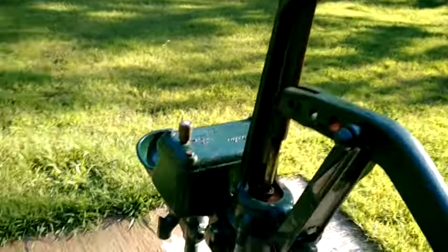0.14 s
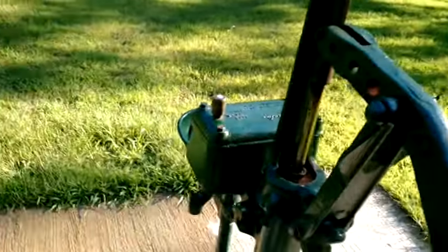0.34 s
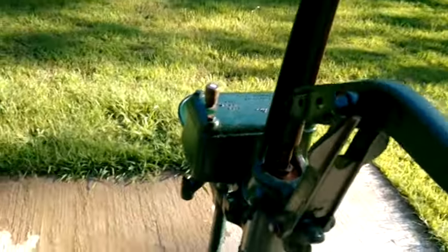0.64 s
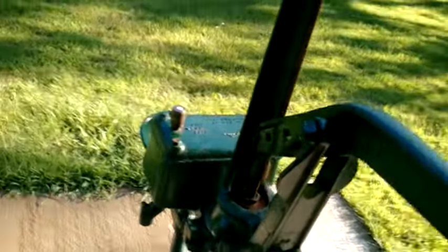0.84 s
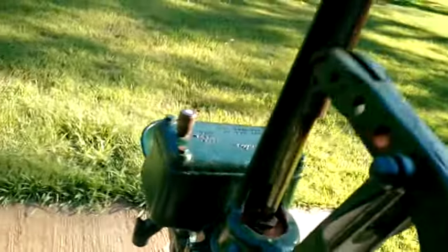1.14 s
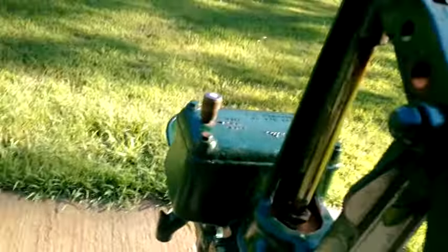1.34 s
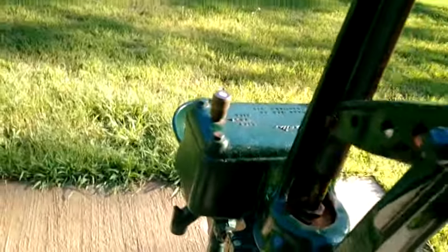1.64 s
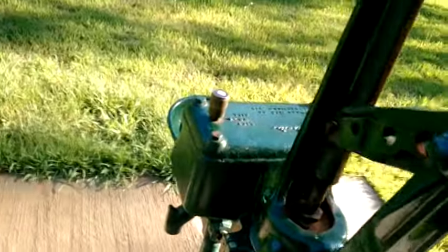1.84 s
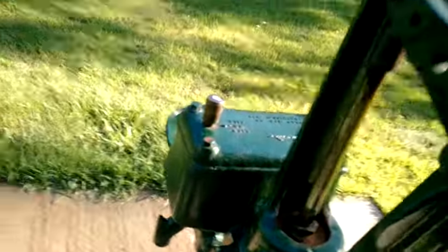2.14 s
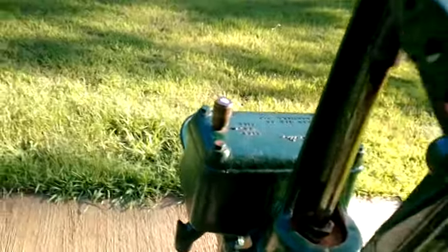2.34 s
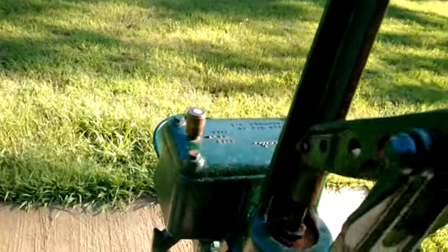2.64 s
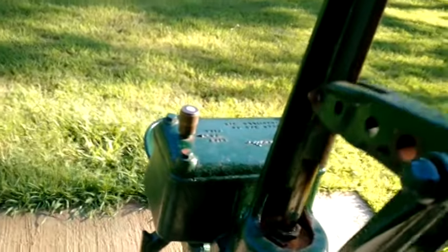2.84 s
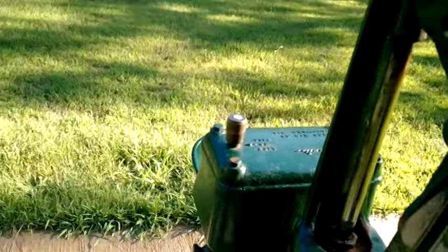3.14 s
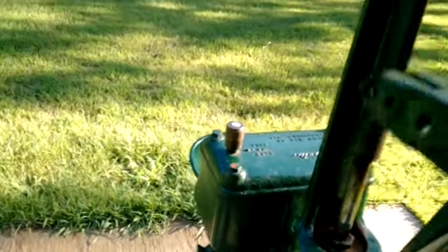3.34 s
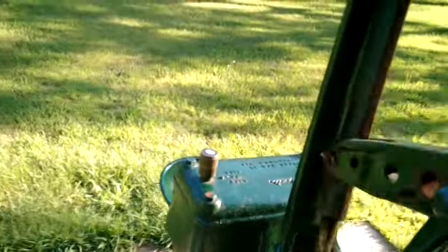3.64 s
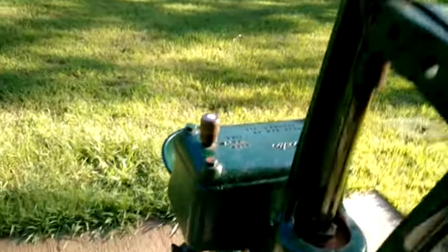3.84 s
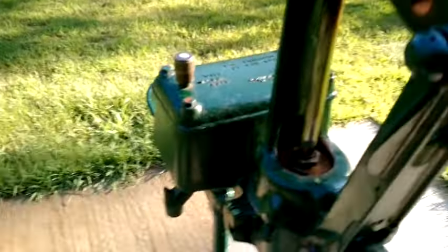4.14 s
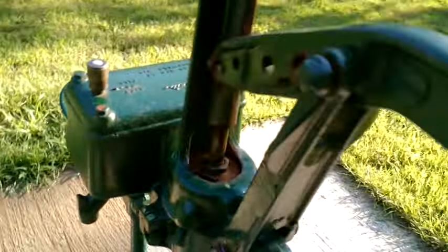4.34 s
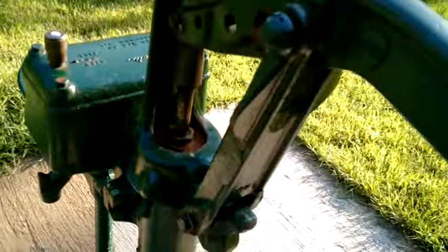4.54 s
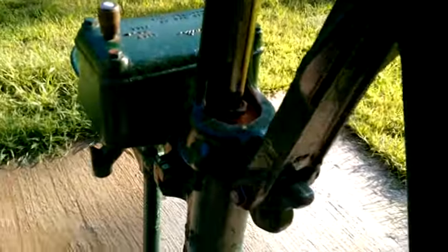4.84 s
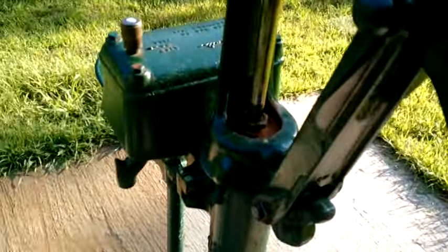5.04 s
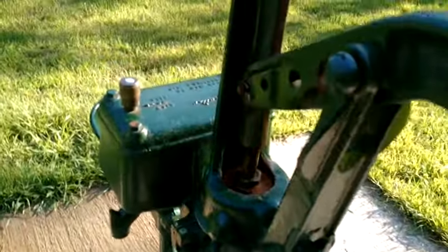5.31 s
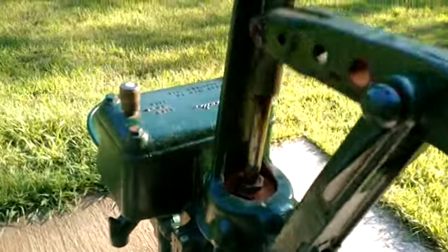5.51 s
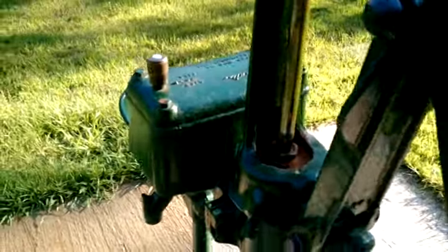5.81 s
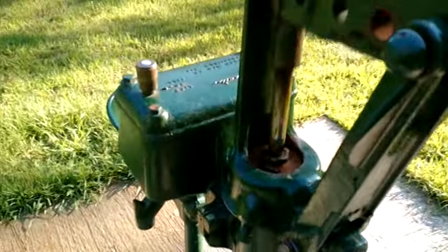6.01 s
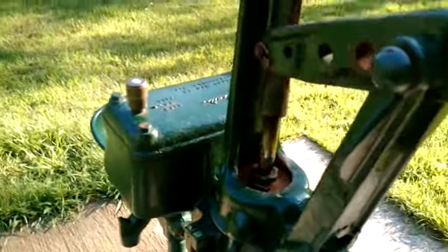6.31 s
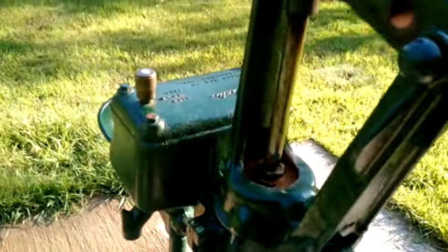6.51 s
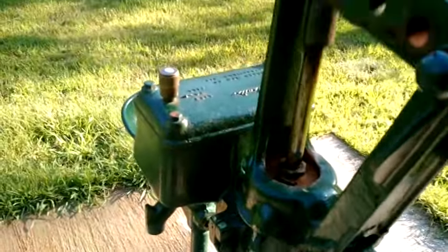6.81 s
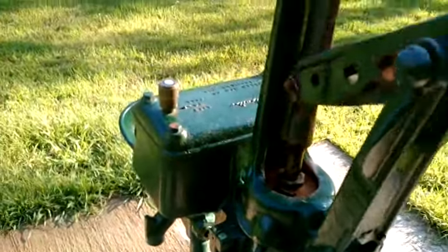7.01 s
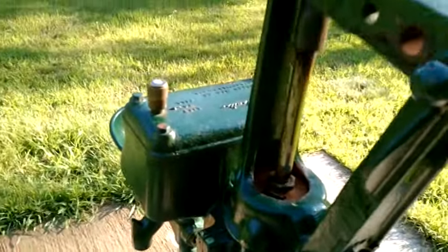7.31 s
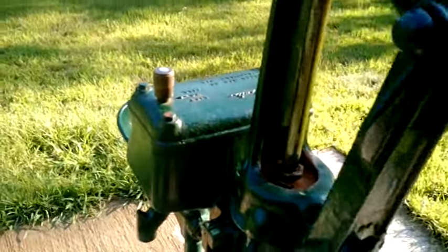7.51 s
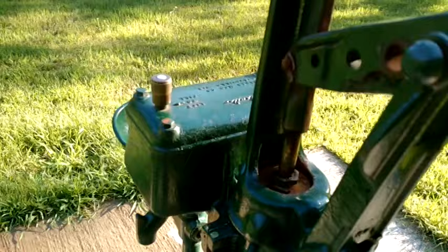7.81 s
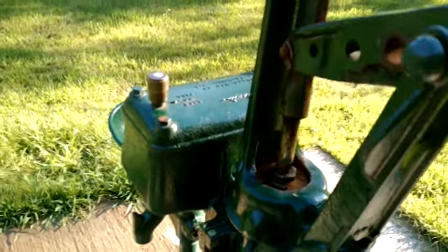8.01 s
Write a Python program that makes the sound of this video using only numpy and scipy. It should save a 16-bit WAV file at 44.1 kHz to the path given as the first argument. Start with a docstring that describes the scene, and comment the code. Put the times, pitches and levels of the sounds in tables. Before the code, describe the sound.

A dry iron hand pump squeals and clanks about once a second outdoors, with water splattering and gurgling in bursts and faint wind rumble.

```python
"""Squeaky hand pump on a lawn

A cast-iron hand pump is worked about once every 0.9 s, while light wind rumbles on the microphone.
Water is filtered noise mixed with many tiny ringing bubbles and drops; it comes in bursts of hiss and
splatter and in hollow, bubbling swells. Slack linkage clanks as short bursts of coloured noise.
The dry pivot squeals, mostly stepping down in pitch: stacks of harmonics with an unsteady pitch and level.
Whistles and groans are short gliding tones, and the squealing also stirs the ringing of the iron lever."""
import sys
import numpy as np
from scipy import signal
from scipy.fft import rfft, irfft
from scipy.io import wavfile
from scipy.ndimage import uniform_filter1d, map_coordinates

SR = 44100
rng = np.random.default_rng(int(sys.argv[2]) if len(sys.argv) > 2 else 0)


def bounce(signal):
    """Save signal as a 16-bit WAV file at the path given by the first command-line argument."""
    frames = np.transpose(np.atleast_2d(signal))
    limited = np.clip(frames, -1, 1)
    pcm = np.round(limited * 32767).astype(np.int16)
    wavfile.write(sys.argv[1], SR, pcm)


N = 359856
T = np.arange(N) / SR   # time of every sample [s]


def from_db(db):
    """Turn decibels into a gain."""
    return 10 ** (np.asarray(db) / 20)


def rms_one(x):
    """Scale to an rms (average strength) of 1."""
    return x / np.sqrt(np.mean(x ** 2) + 1e-20)


def follow(rows, t):
    """Read a (time, level) curve at times t, with straight lines between its points."""
    times, levels = np.transpose(rows)
    return np.interp(t, times, levels)


def colour(x, spectrum):
    """Filter a steady sound by (frequency [Hz], gain [dB]) points, steeply cut outside them; rms 1."""
    hz, db = np.transpose(spectrum)
    log_hz = np.log(np.maximum(np.fft.rfftfreq(len(x), 1 / SR), 1))
    below = np.maximum(np.log(hz[0]) - log_hz, 0)
    above = np.maximum(log_hz - np.log(hz[-1]), 0)
    gain = from_db(np.interp(log_hz, np.log(hz), db)) * np.exp(-4 * (below + above))
    return rms_one(irfft(rfft(x) * gain, len(x)))


def drift(rate, size):
    """A smooth random wander with a spread of about 1, heading somewhere new `rate` times a second."""
    knots = rng.standard_normal(4096)
    return map_coordinates(knots, [np.arange(size) * rate / SR], order=2, mode="wrap")


def ring(x, hz, t60):
    """A resonance: a unit click starts a sine of height 1 that falls 60 dB in t60 seconds."""
    r, w = from_db(-60 / (t60 * SR)), 2 * np.pi * hz / SR
    return signal.lfilter([0, np.sin(w)], [1, -2 * r * np.cos(w), r * r], x + 1e-18)


def envelope(x, size=900):
    """Running rms level over `size` samples."""
    return np.sqrt(np.abs(uniform_filter1d(x ** 2, size=size)) + 1e-12)


def bump(s, rise, fall):
    """A rounded hump of height 1 at time s, with its own rise and fall times [s]."""
    return np.exp(-np.minimum(((T - s) / np.where(T < s, rise, fall)) ** 2, 60))


def swells(rows, fall):
    """Add up the power of humps (peak time [s], rise [s], level [dB]); each falls in `fall` times its rise."""
    return sum(from_db(db) ** 2 * bump(s, rise, fall * rise) for s, rise, db in rows)


# Tone of the wind rumble: (frequency [Hz], gain [dB])
WIND_TONE = [(14, 3), (26, 4.5), (45, -4), (70, -17), (100, -18.5), (160, -35.5), (400, -30.5)]
# Strength of the steady breeze: (time [s], level [dB])
BREEZE_LEVEL = [(0.0, -42), (1.7, -51.5), (2.3, -56), (3.1, -51), (6.1, -50.5), (7.6, -50)]
# Puffs that bump the microphone: (peak time [s], rise [s], level [dB])
WIND_PUFFS = [(0.235, 0.039, -38), (0.46, 0.04, -44.5), (1.01, 0.077, -40), (1.23, 0.027, -38),
              (1.4, 0.0083, -38), (1.77, 0.02, -41), (3.25, 0.013, -44), (3.68, 0.058, -37.5),
              (4.85, 0.02, -40.5), (5.7, 0.018, -43), (7.33, 0.046, -45.5), (8.1, 0.034, -34.5)]
BREEZE_SWING_DB = 1.5


def wind(buffet_db=-7, puff_fall=0.99, lumps_db=4.0):
    """Air pressing on the microphone gives a low rumble; puffs add a lumpy thump higher in pitch."""
    breeze = from_db(follow(BREEZE_LEVEL, T) + BREEZE_SWING_DB * drift(9, N))
    puffs = np.sqrt(swells(WIND_PUFFS, puff_fall))
    rumble = colour(rng.standard_normal(N), WIND_TONE)
    thump = colour(rng.standard_normal(N), [(55, 19.5), (100, 9.5), (180, -4.5)])
    buffet = from_db(buffet_db + lumps_db * drift(60, N)) * thump
    return np.hypot(breeze, puffs) * rumble + puffs * buffet


def grains(per_s, low_hz, high_hz, cycles, spread_db, clump_db):
    """Clumps of ringing bubbles or drops, each dealt one of 20 pitches and down 60 dB after `cycles` cycles."""
    sizes = from_db(spread_db * np.minimum(rng.exponential(1, N), 4)) * rng.choice([-1, 1], N)
    born = rng.random(N) < per_s * from_db(clump_db * drift(50, N)) / SR
    pitches = np.geomspace(low_hz, high_hz, 20)
    dealt = rng.integers(0, len(pitches), N)
    total = 0
    for k, hz in enumerate(pitches):
        total = total + hz / low_hz * ring(sizes * born * (dealt == k), hz, cycles / hz)
    return rms_one(total)


def glugs(per_s=85, low_hz=850, high_hz=1400, cycles=4, rise=0.036, spread_db=9, size=3000):
    """Big air pockets break loose and ring, rising in pitch as they near the surface."""
    out, t = np.zeros(N + size), np.arange(size) / SR
    for when, pitch, strength in rng.random((int(per_s * N / SR), 3)):
        hz = low_hz * (high_hz / low_hz) ** pitch
        age = t * hz / cycles
        tone = np.sin(2 * np.pi * hz * t * (1 + rise * age / 2))
        out[int(when * N):][:size] += from_db(spread_db * strength) * age * np.exp(-age) * tone
    return rms_one(out[:N])


BURST_ATTACK_S, BURST_RELEASE_S = 0.015, 0.038


def burst_shape(start, length):
    """A burst rises quickly, holds, then trails off."""
    rise = np.clip((T - start) / BURST_ATTACK_S, 0, 1)
    return rise * np.exp(-np.clip((T - start - length) / BURST_RELEASE_S, 0, 20))


# Water that keeps running between strokes: (time [s], level [dB])
RUNNING_WATER = [(0.0, -52.5), (0.6, -46.5), (1.2, -47), (1.6, -48), (2.1, -55), (3.0, -48.5), (3.8, -45),
                 (4.7, -48), (5.6, -47.5), (6.3, -45.5), (7.4, -44.5), (8.16, -47.5)]
# Swells of hollow, bubbling noise, one of them under a clank: (peak time [s], rise [s], level [dB])
HOLLOW_SWELLS = [(0.69, 0.056, -42.5), (0.745, 0.047, -43), (1.7, 0.085, -40), (2.65, 0.11, -48),
                 (3.49, 0.058, -47.5), (4.385, 0.089, -43), (5.24, 0.063, -43), (6.155, 0.074, -45.5),
                 (7.02, 0.094, -43), (7.86, 0.081, -43), (8.12, 0.029, -42)]
# Bursts of hiss, splatter and hollow low noise, some under squeals or clanks:
# (start [s], length [s], splatter level [dB], hollow level [dB])
SPLATTER_BURSTS = [(0.435, 0.39, -74, -52.5), (0.708, 0.013, -28.5, -33), (0.888, 0.08, -33, -55),
                   (1.274, 0.055, -33, -49.5), (1.389, 0.12, -41, -48.5), (2.302, 0.19, -44, -55.5),
                   (3.199, 0.12, -42, -53.5), (3.579, 0.1, -39.5, -52.5), (3.993, 0.22, -38.5, -51.5),
                   (4.538, 0.27, -38.5, -55), (4.882, 0.16, -42.5, -52), (4.963, 0.21, -38, -54),
                   (5.353, 0.058, -42, -53.5), (5.749, 0.25, -40.5, -52.5), (6.304, 0.23, -34, -54.5),
                   (6.667, 0.1, -34, -47.5), (7.122, 0.1, -32, -49.5), (7.524, 0.095, -37, -48.5),
                   (8.013, 0.078, -31, -50)]
# The water falters as the handle stalls: (time [s], half length [s])
WATER_LULLS = [(0.4, 0.013), (1.22, 0.042), (2.95, 0.043), (3.814, 0.022), (4.84, 0.018), (5.706, 0.031),
               (6.65, 0.013), (7.907, 0.0097)]
LULL_DB = -4.5
FLOW_BOX_DB, FLOW_BUBBLE_DB, FLOW_SPLATTER_DB = -13.5, 1.5, 0   # against the running water's level
SWELL_BUBBLE_DB, SWELL_SPLATTER_DB = 5, -0.5   # against the level of a swell
BURST_BUBBLE_DB = -24   # against the splatter level of a burst


def water_levels():
    """Running water, swells and bursts add in power: the gains of spout box, bubbling and splatter."""
    flow = from_db(follow(RUNNING_WATER, T))
    swell = np.sqrt(swells(HOLLOW_SWELLS, fall=1))
    burst = burst_box = 0
    for start, length, splatter_db, box_db in SPLATTER_BURSTS:
        shape = burst_shape(start, length)
        burst = burst + from_db(splatter_db) * shape
        burst_box = burst_box + from_db(box_db) * shape
    box = [from_db(FLOW_BOX_DB) * flow, swell, burst_box]
    bubbling = [from_db(FLOW_BUBBLE_DB) * flow, from_db(SWELL_BUBBLE_DB) * swell, from_db(BURST_BUBBLE_DB) * burst]
    splatter = [from_db(FLOW_SPLATTER_DB) * flow, from_db(SWELL_SPLATTER_DB) * swell, burst]
    lull = sum(bump(s, half, half) for s, half in WATER_LULLS)
    return np.linalg.norm([box, bubbling, splatter], axis=1) * from_db(LULL_DB * lull)


# Tone of the hollow spout box: (frequency [Hz], gain [dB])
BOX_TONE = [(100, -55), (160, -17), (220, -11.5), (280, -12.5), (420, -17.5), (500, 5), (550, 2),
            (600, 6.5), (660, -5.5), (800, -2), (1000, -1.5)]
# Tone of the gurgling bubbles: (frequency [Hz], gain [dB])
BUBBLE_TONE = [(500, -30), (800, -35), (1050, 3), (1400, -0.5), (2000, 0), (2700, -3.5), (3600, -9.5),
               (5000, -8.5), (10000, -23)]
# Tone of the splattering drops: (frequency [Hz], gain [dB])
SPLATTER_TONE = [(1000, -3.5), (2000, 10), (2900, -2), (3800, 9.5), (4500, 7.5), (5400, 3), (7000, 3.5),
                 (8500, -3.5), (11000, -6), (13500, -14), (15500, -18)]


def water(slosh_db=1.0):
    """The spout box resounds with a hollow tone; bubbles gurgle in it and drops splatter below."""
    box_gain, bubble_gain, splatter_gain = water_levels() * from_db(slosh_db * drift(22, N))
    surge = grains(per_s=560, low_hz=136.0, high_hz=984, cycles=11.8, spread_db=0.0, clump_db=2.5)
    bubbles = grains(per_s=650, low_hz=789.0, high_hz=4970, cycles=56, spread_db=3.5, clump_db=8.0)
    drops = grains(per_s=1800, low_hz=1750, high_hz=14200, cycles=29, spread_db=4.5, clump_db=6.5)
    hollow = colour(surge + 1.15 * rng.standard_normal(N), BOX_TONE)
    box = box_gain * (hollow + from_db(0.1) * glugs())
    gurgle = bubble_gain * colour(bubbles + 1.5 * rng.standard_normal(N), BUBBLE_TONE)
    spray = 0.94 * from_db(8.8 * np.tanh(drift(45, N))) * rng.standard_normal(N)
    splatter = splatter_gain * colour(drops + spray, SPLATTER_TONE)
    return box + gurgle + splatter


# The valve drops on its seat as the handle turns: (time [s], level [dB])
VALVE_DROPS = [(1.407, -28), (2.327, -33.5), (3.216, -29), (4.085, -29), (4.557, -28), (4.986, -26.5),
               (5.847, -33), (6.722, -33.5)]
# Tones the valve rings with: (frequency [Hz], level [dB])
VALVE_MODES = [(560, -8), (1120, -3), (1930, 1), (2450, -1.5), (3550, 2)]


def valve(contact_s=0.0021, t60=0.021, ring_db=-16, click_db=-7, size=1500):
    """Each seating is a short gritty contact that sets the valve ringing."""
    push, t = np.zeros(N), np.arange(size) / SR
    for s, db in VALVE_DROPS:
        push[int(s * SR):][:size] += from_db(db) * np.exp(-t / contact_s)
    push *= colour(rng.standard_normal(N), CLANK_TONE)
    ringing = sum(from_db(db) * ring(push, hz, t60) for hz, db in VALVE_MODES)
    return from_db(ring_db) * ringing + from_db(click_db) * push


# Tones the iron lever rings with: (frequency [Hz], level [dB])
LEVER_MODES = [(1735, 7.5), (1980, 3), (2110, 8), (2650, 3), (3095, -5), (3898, 9), (4463, -21), (5020, 3),
               (5990, 0)]
LEVER_T60_S = 0.095   # time to fall 60 dB


def lever(x):
    """The iron lever rings at its own pitches when driven by x."""
    return sum(from_db(db) * ring(x, hz, LEVER_T60_S) for hz, db in LEVER_MODES)


# the weakest tick is set TICK_DB above the running water's level
TICKS_PER_S, TICK_DB, TICK_SPREAD_DB = 22, 13, 16


def ticks(count=400):
    """Grit and drops tick on the casting at random, stronger as more water runs; rows like the clanks."""
    times = np.cumsum(rng.exponential(1 / TICKS_PER_S, count))
    levels = follow(RUNNING_WATER, times) + TICK_DB + TICK_SPREAD_DB * rng.random(count) ** 2
    trebles = rng.normal(-4.1, 1.7, count)
    return [(s, db, treble_db, -17) for s, db, treble_db in zip(times, levels, trebles) if s < T[-1]]


# Clanks and ticks of the slack linkage: (time [s], level [dB], treble gain [dB], rattling tail [dB])
LINKAGE_CLANKS = [(0.107, -22, -8, -4.5), (0.153, -18.5, -4, -10), (0.717, -22, -7, -3),
                  (0.742, -10.5, -6, -9.5), (0.76, -6.5, -25, -16), (0.915, -18, -0.5, -6),
                  (1.001, -23.5, 5, -7), (1.721, -18, -9, -7), (1.821, -9, -27, -22), (1.832, -4, 2.5, -28),
                  (1.891, -23, -8, -5.5), (2.663, -18, -9, -12.5), (2.735, -4.5, -4, -21.5),
                  (2.794, -15.5, -9.5, -8), (3.259, -24, 5, -18), (3.316, -22, 2, -16.5),
                  (3.603, -14, -6.5, -3), (3.67, -5.5, -3.5, -25), (4.194, -35, -9, -30),
                  (4.314, -24, -2, -20), (4.423, -17, -23, -10), (4.501, -20.5, -6, -3),
                  (4.51, -7, -4.5, -15), (4.568, -11.5, -2.5, -12.5), (4.919, -15.5, -16, -15),
                  (4.945, -22, 2, -9.5), (5.008, -12.5, 6.5, -20), (5.375, -6.5, 1, -15.5),
                  (5.426, -17.5, -3, -10.5), (5.77, -14.5, -11, -13), (5.799, -21, 3, -11.5),
                  (5.869, -26.5, 10, -15), (5.96, -28, 9, -15), (5.969, -25, 8, -15), (6.07, -21, -3, -20),
                  (6.226, -12, -11, -27), (6.256, -16.5, -12, -3.5), (6.294, -8.5, -8, -21),
                  (6.315, -11.5, -12, -8.5), (6.509, -34, 20, -17), (6.668, -23, 3, -5.5),
                  (6.898, -16, -0.5, -17), (7.104, -16, -11.5, -3), (7.155, -14, 1, -8.5),
                  (7.2, -23, 11, -19), (7.242, -5.5, 2.5, -20), (7.582, -22, 2.5, -11),
                  (7.97, -9.5, -9, -8), (8.001, -6, -17, -23), (8.021, -24, 8, -10.5), (8.104, -15, -5, -8)]
# Tone of the crunching iron, used for the valve too: (frequency [Hz], gain [dB])
CLANK_TONE = [(180, -19), (300, -26), (509, -3), (794, -6.5), (1390, -3), (1750, 4), (3810, 7.5), (5570, 4),
              (6790, 9.5), (9930, -4.5), (11700, -3), (15500, -18)]


def clanks(crack_s=0.00081, tail_s=0.0095, ring_db=-52, scuff_db=-22, scuff_s=0.0025, size=5000):
    """Slack parts scuff, then knock with a crunch of rusty iron and a rattling tail; the lever rings after."""
    out, t = np.zeros(N + 2 * size), np.arange(-size // 4, size) / SR
    crunch = colour(rng.standard_normal(len(out)), CLANK_TONE)
    dull = signal.sosfiltfilt(signal.butter(2, 4800, fs=SR, output="sos"), crunch)
    after = np.maximum(t, 0)
    onset = 1 - np.exp(-after / 0.0012)
    crack, tail = np.exp(-after / crack_s), np.exp(-after / tail_s)
    scuff = from_db(scuff_db) * np.exp(-np.abs(t) / scuff_s)
    for s, db, treble_db, tail_db in [*LINKAGE_CLANKS, *ticks()]:
        shape = scuff + onset * (crack + from_db(tail_db) * tail)
        at = int((s + t[0]) * SR) + np.arange(len(t))
        treble = from_db(treble_db) * (crunch[at] - dull[at])
        out[at] += from_db(db) * shape * (dull[at] + treble)
    return (out + from_db(ring_db) * lever(out))[:N]


def stray_slips(per_s=100, low_hz=1650, high_hz=9500, swell_s=0.011, sag_per_s=0.74, spread_db=10, size=5000):
    """Small spots of rust sing briefly on their own: faint overlapping tones that slide down."""
    out, t = np.zeros(N + size), (np.arange(size) - size // 2) / SR
    hump = np.exp(-.5 * (t / swell_s) ** 2)
    for when, pitch, strength, slide in rng.random((int(per_s * N / SR), 4)):
        hz = low_hz * (high_hz / low_hz) ** pitch
        tone = np.sin(2 * np.pi * hz * t * (1 - sag_per_s * slide * t))   # pitch falls at twice this rate
        out[int(when * N):][:size] += from_db(spread_db * strength) * hump * tone
    return rms_one(out[size // 2:][:N])


def rubbing(song, rub_db=-36, scrape_db=-36, stray_db=-30, grit_db=4):
    """While a joint sings, its rough faces also scrape, chirp and stir all the tones of the lever."""
    pressure = np.sqrt(envelope(song, size=2600))
    grit = rng.standard_normal(N) * from_db(grit_db * drift(250, N))
    modes = from_db(rub_db) * rms_one(lever(grit))
    scrape = from_db(scrape_db) * colour(grit, [(2500, 25.5), (7000, 17.0), (11000, 4.6), (15000, 3.3)])
    return pressure * (modes + scrape + from_db(stray_db) * stray_slips())


def chirp(s, hz, swell, die_s, glide, overtone_db, jitter, flutter_db, fall_db=19, rasp=0.05, size=4):
    """A short friction tone with overtones that swells, glides and rings out around time s."""
    near, out = np.abs(T - s) < .15, np.zeros(N)
    t = T[near] - s
    shape = np.where(t < 0, np.exp(-.5 * (t / swell) ** 2), np.exp(1 - np.hypot(1, t / die_s)))
    pitch = hz * 2 ** (glide * t) * (1 + jitter * drift(610, len(t)))
    phase = 2 * np.pi * np.cumsum(pitch) / SR
    phase += rasp * drift(1600, len(t))   # uneven slips make the tone noisy at its edges
    tone = np.sin(phase)
    for k in range(size - 1):
        tone += from_db(overtone_db - fall_db * np.sqrt(k)) * np.sin((k + 2) * phase)
    out[near] = np.sqrt(2) * from_db(flutter_db * drift(155.0, len(t))) * shape * tone
    return out


# Lower squeaks as the handle slows: (peak time [s], pitch [Hz], level [dB], half length [s],
# glide [octaves/s], 2nd harmonic [dB against the first])
PIVOT_GROANS = [(0.224, 1724, -36.5, 0.0091, -0.5, -23), (0.315, 1722, -36, 0.025, 0, -30),
                (0.276, 964, -42.5, 0.014, -1, -16), (2.267, 992, -44.5, 0.0075, -3.5, -6),
                (3.102, 1704, -43.5, 0.022, 0.5, -14), (3.981, 1075, -33, 0.0097, -5, -15),
                (4.853, 1205, -30, 0.016, -3, -12), (7.155, 1674, -32.5, 0.0075, 1, -22),
                (7.908, 1250, -31.5, 0.0041, 2.5, -18), (8.032, 1390, -32.5, 0.0057, 1.5, -9),
                (8.061, 1750, -33.5, 0.019, -1.5, -29), (8.118, 1750, -33.5, 0.012, -0.5, -26)]


def groans():
    """Slower, rougher slips at the turn of the stroke."""
    total = 0
    for s, hz, db, half, glide, second_db in PIVOT_GROANS:
        tone = chirp(s, hz, half, 1.75 * half, glide, second_db, jitter=0.019, flutter_db=4.0)
        total = total + from_db(db) * tone
    return total


# Short high whistles, some of them the bright second harmonic of a squeal: (peak time [s], pitch [Hz],
# level [dB], swell [s], fade [s], glide [octaves/s], 2nd harmonic [dB against the first])
HIGH_WHISTLES = [(0.954, 2550, -25, 0.018, 0.014, 0.9, -10.5), (1.287, 3845, -24, 0.0086, 0.009, 0.4, -28),
                 (1.32, 2930, -35, 0.0092, 0.025, 0.7, -5), (2.199, 3900, -32.5, 0.0046, 0.013, 0.5, -29),
                 (2.875, 4560, -41, 0.029, 0.016, 1, -28), (3.156, 2870, -37, 0.003, 0.0083, 2, -6),
                 (3.784, 3917, -26.5, 0.012, 0.0056, 0.1, -24), (3.941, 3100, -26, 0.044, 0.011, 0.13, -20),
                 (3.98, 3010, -37, 0.0072, 0.0097, -1, -16), (4.786, 2645, -20.5, 0.031, 0.017, -1, -24),
                 (4.884, 3063, -34, 0.0057, 0.0077, -1.3, -1.5),
                 (5.623, 3180, -35.5, .022, 0.0098, 0.8, -27), (6.348, 4940, -35, 0.012, 0.0079, 2, -12),
                 (6.38, 3070, -29, 0.011, 0.009, 1, -22), (6.406, 4430, -28, .007, 0.0058, -0.55, -25),
                 (6.463, 3900, -15.5, .018, 0.011, 0.05, -32), (6.579, 3075, -29, 0.006, 0.025, -0.8, -6.5),
                 (6.629, 2980, -35, 0.03, 0.0068, -0.8, -1), (7.18, 3070, -27, 0.012, .006, 2, -20),
                 (7.221, 3920, -28, .008, .006, 1.5, -17), (7.281, 3920, -25.5, 0.0049, 0.0056, 1.2, -19),
                 (7.365, 4450, -34.5, 0.018, 0.016, 1, -20), (7.334, 3884, -27.5, 0.013, 0.0077, 0.2, -33),
                 (7.427, 3890, -25, 0.0073, 0.0063, 1, -20), (7.445, 3090, -35, 0.0073, 0.011, 1, -7),
                 (7.467, 2946, -35.5, .008, 0.0088, -2.5, 0.5),
                 (8.067, 4465, -19.5, 0.0087, 0.0045, 0, -28),
                 (8.106, 4460, -22.5, 0.0085, 0.0049, 0.5, -29),
                 (8.158, 3856, -16.5, 0.0097, .012, -2.3, -28)]


def whistles():
    """Short high tones that swell, slide in pitch and fade, some as a squeal's bright second harmonic."""
    total = 0
    for s, hz, db, swell, fade, glide, second_db in HIGH_WHISTLES:
        tone = chirp(s, hz, swell, fade, glide, second_db, jitter=0.0053, flutter_db=2.0)
        total = total + from_db(db) * tone
    return total


def screech(squeal, whistle, mix_db=-17, second_db=-11, low_hz=3600):
    """Squeal and whistle share one contact and modulate each other: sum tones slide above both."""
    a, b = envelope(squeal), envelope(whistle)
    mixed = squeal * whistle / np.sqrt(a * b)
    mixed *= 1 + from_db(second_db) * (squeal / a + whistle / b)
    highpass = signal.butter(2, low_hz, "high", fs=SR, output="sos")
    return from_db(mix_db) * signal.sosfilt(highpass, mixed)


SQUEAL_ATTACK_S, SQUEAL_RELEASE_S = 0.0072, 0.011


def stick_slip(row, jitter, waver, flutter_db, fray_db, fall_db, shake, shake_hz, rasp, size=7):
    """One slip: the pivot sticks and lets go over and over, a harmonic tone that quivers with the rust's grip."""
    start, length, first_hz, last_hz, *levels, growth_db = row
    inside = (T >= start) & (T < start + length + 2 * SQUEAL_RELEASE_S)
    t, out = T[inside] - start, np.zeros(N)
    progress = np.minimum(t / length, 1)
    hz = first_hz + (last_hz - first_hz) * np.sin(np.pi / 2 * progress) ** 2
    hz *= 1 + jitter * drift(282.0, len(t)) + waver * drift(39.0, len(t))
    phase = 2 * np.pi * np.cumsum(hz) / SR + rasp * drift(2100, len(t))
    # the shuddering rod adds side tones
    phase += shake * rms_one(ring(rng.standard_normal(SR)[:len(t)], shake_hz, 0.015))
    grip_db = growth_db * (progress - .5) + flutter_db * np.tanh(drift(66.0, len(t)))
    for k in range(size):
        # harmonics beyond the table fall by fall_db each
        db = levels[min(k, len(levels) - 1)] - fall_db * max(k + 1 - len(levels), 0)
        fray = fray_db * np.sqrt(k + 1) * np.tanh(drift(135.0, len(t)))   # upper harmonics fray most
        out[inside] += np.sqrt(2) * from_db(db + grip_db + fray) * np.sin((k + 1) * phase)
    fade = np.exp(-2 * np.maximum((t - length) / SQUEAL_RELEASE_S + 1, 0))
    out[inside] *= np.minimum(t / SQUEAL_ATTACK_S, 1) * fade
    return out


# The pivot squeals in runs of short slips, mostly stepping down in pitch:
# (start [s], length [s], first pitch [Hz], last pitch [Hz], fundamental [dB], 2nd harmonic [dB],
# 3rd harmonic [dB], 4th harmonic [dB], growth over the slip [dB])
PIVOT_SQUEALS = [(0.013, 0.21, 2266, 2225, -32.5, -37.5, -51, -62, -2.5),
                 (0.177, 0.059, 2180, 2040, -31, -38, -35.5, -43.5, -2),
                 (0.223, 0.054, 2023, 1965, -26, -55, -59, -68, -15),
                 (0.267, 0.0512, 2122, 1970, -18.5, -32.5, -36.5, -47, 13),
                 (0.308, 0.041, 1986, 1952, -13.5, -30.5, -34.5, -46.5, 3),
                 (0.346, 0.055, 1932, 1964, -35, -49, -61, -79, -24),
                 (0.963, 0.093, 2240, 2232, -22, -30.5, -31, -47.5, 5),
                 (1.048, 0.072, 2250, 2220, -31.5, -31.5, -33.5, -53, -9),
                 (1.104, 0.047, 2206, 2215, -32.5, -22.5, -46, -56, -4),
                 (1.14, 0.069, 2210, 2150, -39.5, -52, -69, -78, -11),
                 (1.924, 0.052, 2160, 2200, -41, -53, -51, -69, -8),
                 (1.967, 0.125, 2243, 2120, -40, -49, -54.5, -70, -4),
                 (2.108, 0.05, 2055, 1910, -28.5, -47, -39.5, -63, 16),
                 (2.912, 0.03, 2290, 2200, -39.5, -54, -68, -77, -3),
                 (2.978, 0.061, 1356, 1330, -32, -38.5, -54, -65, 8),
                 (3.026, 0.068, 1334, 1307, -50, -41, -66, -59, -16),
                 (3.796, 0.055, 2226, 2080, -37, -48, -68, -75, -8),
                 (3.848, 0.056, 2090, 2000, -37.5, -47, -37.5, -48, 2),
                 (4.593, 0.068, 2180, 2240, -34.5, -43, -47, -55, 4),
                 (4.653, 0.046, 2150, 2144, -29, -43, -56, -68, 5),
                 (4.751, 0.07, 2026, 1925, -27, -38.5, -48, -56, 11),
                 (5.458, 0.037, 2280, 2190, -40.5, -43.5, -46, -57, -11),
                 (5.498, 0.09, 2290, 2140, -33.5, -46, -57, -58, 0),
                 (5.589, 0.055, 2125, 2050, -31, -53, -64, -68, 8),
                 (5.641, 0.052, 2018, 1928, -28.5, -33.5, -43, -56, -17),
                 (6.329, 0.09, 2310, 2216, -28.5, -50, -47, -57, -11),
                 (6.413, 0.096, 2112, 2090, -28.5, -45, -38, -52, -2),
                 (6.505, 0.066, 2030, 1986, -23, -33.5, -50, -50, 13),
                 (7.232, 0.08, 2225, 2210, -40.5, -31, -51, -56, -16),
                 (7.301, 0.077, 2110, 2084, -24, -43.5, -52, -55, 10)]


def squeals():
    """The dry pivot sings in mid-stroke, slip after slip."""
    return sum(stick_slip(row, jitter=0.0059, waver=0.0016, flutter_db=3.0, fray_db=3.0, fall_db=4,
                          shake=0.015, shake_hz=534, rasp=0.036) for row in PIVOT_SQUEALS)


def frame(x, t60=0.019, wet_db=-16, size=8000):
    """The dense, short ring of the pump's casting spreads every sound of the ironwork."""
    response = rng.standard_normal(size) * from_db(-60 * np.arange(size) / SR / t60)
    return x + from_db(wet_db) * signal.fftconvolve(x, response / np.linalg.norm(response))[:N]


def scene(singing_db=-66):
    """Ironwork, water and wind at one microphone; the lever rings on where the singing meets its tones."""
    squeal, whistle = squeals(), whistles()
    song = squeal + whistle + screech(squeal, whistle) + groans()
    iron = song + from_db(singing_db) * lever(song) + rubbing(song) + clanks() + valve()
    return (frame(iron) + water() + wind())[None]


def record(dry, cutoff_hz=15700):
    """The top of the treble is cut steeply."""
    return signal.sosfilt(signal.ellip(14, .1, 90, cutoff_hz, fs=SR, output="sos"), dry)


dry = scene()
out = record(dry)
bounce(out)
```